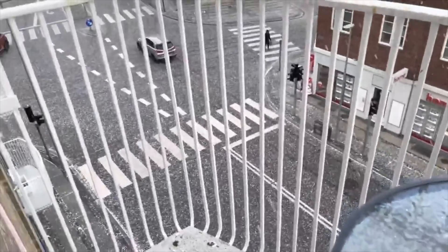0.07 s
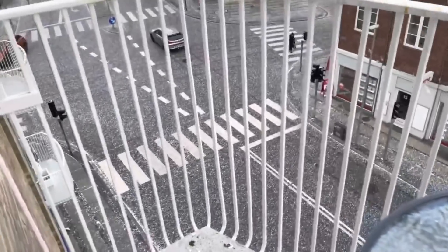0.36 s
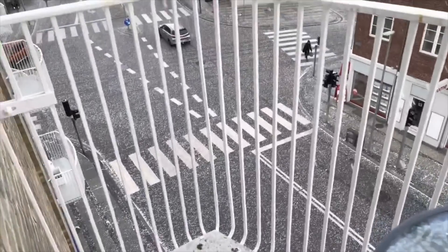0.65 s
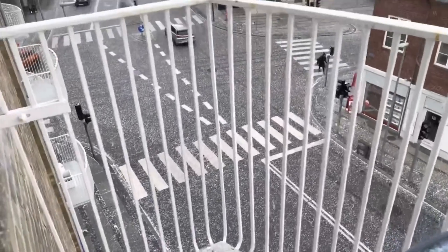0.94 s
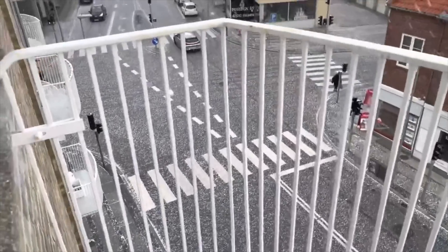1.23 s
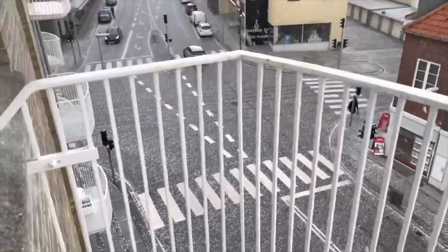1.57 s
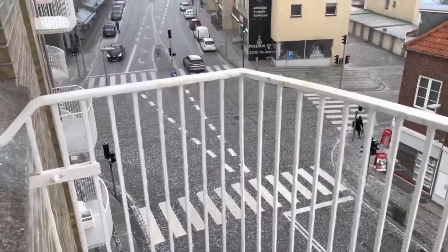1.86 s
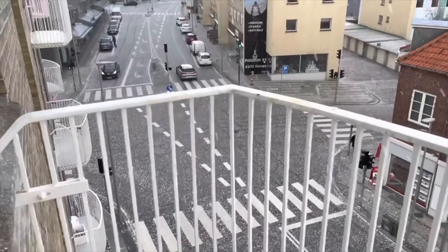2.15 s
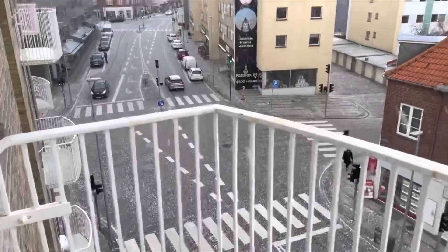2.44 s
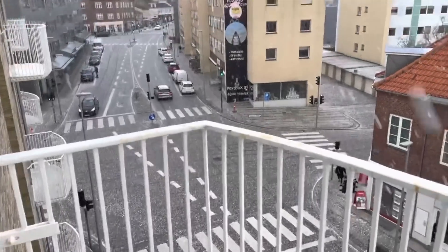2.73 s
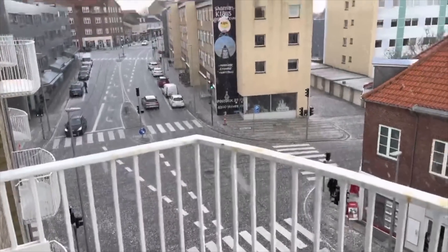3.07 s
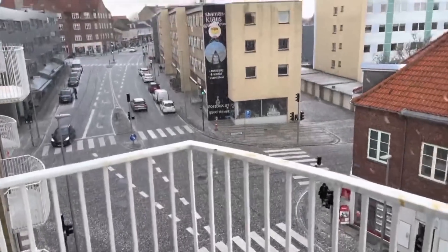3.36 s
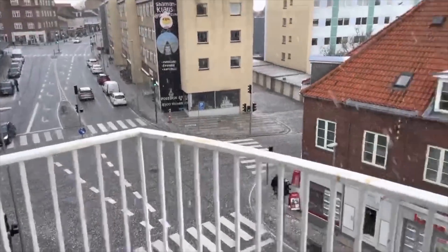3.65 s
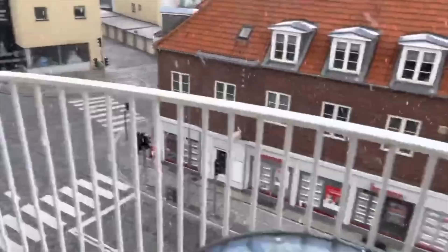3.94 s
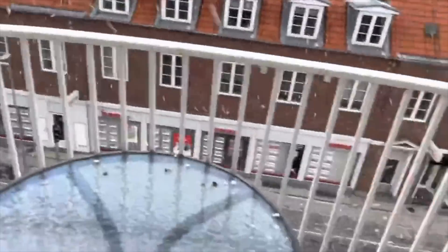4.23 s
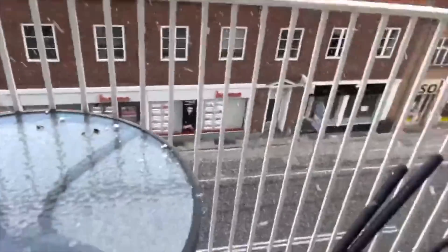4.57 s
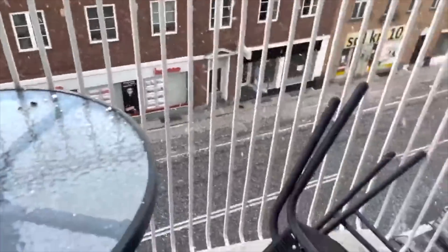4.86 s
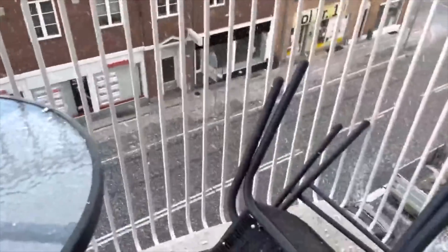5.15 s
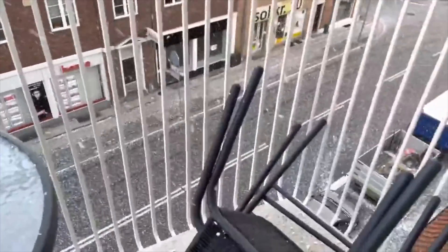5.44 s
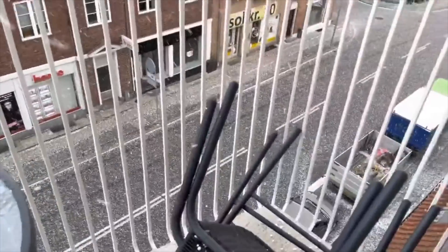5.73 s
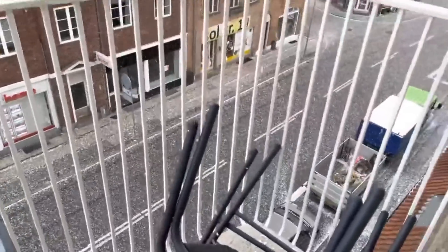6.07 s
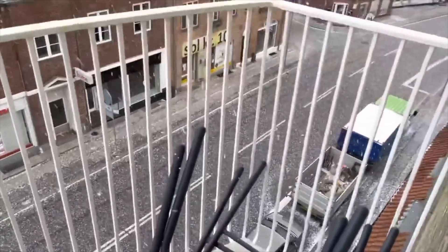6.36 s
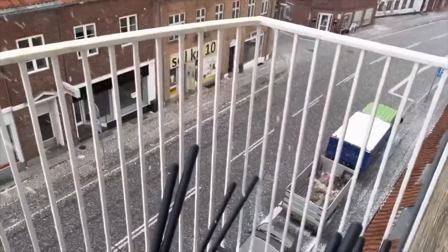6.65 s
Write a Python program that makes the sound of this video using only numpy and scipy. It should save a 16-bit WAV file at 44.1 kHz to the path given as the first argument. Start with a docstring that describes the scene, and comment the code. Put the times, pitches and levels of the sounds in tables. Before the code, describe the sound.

Hail patters on a street and clicks on a balcony while gusting wind buffets the microphone, with one brief dropout.

```python
"""Hail on a street, heard from a high balcony. At first a few stones click on the table and floor near the
microphone, over the far wash of countless others and light gusts. The sound fades to nothing, then at
about 1.7 s jumps back and plays the same moment again. From 3 s the wind roars and buffets the microphone,
a fine patter thickens close by, and more stones click on the balcony or chink off its railing."""
import sys
import numpy as np
from scipy import signal
from scipy.fft import rfft, irfft, next_fast_len
from scipy.io import wavfile
from scipy.ndimage import uniform_filter1d, map_coordinates

SR = 44100
rng = np.random.default_rng(int(sys.argv[2]) if len(sys.argv) > 2 else 0)


def store_wav(level_fs):
    """Save 16-bit WAV to argv[1]."""
    pcm = np.round(np.clip(np.atleast_2d(level_fs), -1, 1) * 32767)
    wavfile.write(sys.argv[1], SR, pcm.T.astype(np.int16))


N = 295401


# The loudest stones, beside the microphone. Each row: start in seconds, relative level in dB, pitch in Hz.
CLOSE_STONES = [(.026, -49, 9500), (.045, -56, 8000), (.125, -57, 9000), (.199, -57, 6500),
                (.239, -52, 9500), (.257, -55, 9000), (.329, -53, 9500), (.341, -56, 7000),
                (.57, -54, 8000), (.583, -52, 9500), (.654, -58, 8000), (.676, -48.5, 8200),
                (.722, -60, 9000), (.93, -63, 11000), (.959, -51, 9000), (1.848, -63, 10000),
                (2.229, -65, 12000), (2.356, -66, 8000), (2.72, -62, 12000), (2.879, -54, 8000),
                (3.152, -52, 12000), (3.188, -48, 6000), (3.207, -53, 8000), (3.256, -49, 10000),
                (3.273, -51, 13000), (3.507, -51, 10000), (3.566, -53, 6000), (3.697, -52, 10000),
                (3.743, -52, 12000), (3.792, -45, 7500), (3.805, -41, 10100), (3.815, -41, 5000),
                (3.87, -50, 8550), (3.941, -44, 7000), (3.95, -49, 8500), (4.0, -40, 10500),
                (4.039, -53, 10000), (4.127, -52, 7500), (4.142, -48, 6450), (4.213, -54, 6000),
                (4.3, -52, 7500), (4.359, -57, 7500), (4.39, -53, 10000), (4.452, -48, 9000),
                (4.696, -39, 6450), (4.705, -42, 3600), (4.76, -56, 8500), (4.816, -57, 11000),
                (4.875, -50, 7000), (4.897, -52, 6500), (4.99, -49, 13000), (5.025, -49, 9500),
                (5.046, -52, 10000), (5.252, -55, 12000), (5.314, -52, 9000), (5.378, -47, 13500),
                (5.396, -52, 7000), (5.71, -49, 8050), (5.724, -42, 8000), (5.732, -44, 10000),
                (5.745, -52, 10500), (5.898, -50, 10000), (5.923, -45, 9000), (5.975, -50, 6500),
                (6.005, -48, 10000), (6.174, -50, 7000), (6.352, -53, 10000), (6.475, -53, 7500),
                (6.598, -48, 8500), (6.626, -54, 9000), (6.673, -56, 7000)]
# Tone of their clicks. Each row: frequency in Hz, gain in dB.
CLICK_SPECTRUM = [(500, -32), (2000, 1), (4000, 0), (6500, -2), (9000, -7), (12000, -5.5), (15500, -6)]

def close_stones():
    """Single stones click on the balcony's table and floor."""
    starts, db, hz = np.transpose(CLOSE_STONES)
    hits = clicks(starts, amp(db - 5), hz, t60=0.036, ring_db=-4, focus_db=4)
    return coloured(hits, CLICK_SPECTRUM)


def clicks(starts, sizes, pitch_hz, t60, ring_db, focus_db):
    """Each stone gives three short rings near its pitch and a noisy crack, focus_db down an octave away."""
    t = np.arange(768) / SR
    pitch = pitch_hz[:, None]
    scatter = np.exp(.25 * rng.standard_normal((len(starts), 4, 1)))
    ring_hz = np.clip(pitch[:, None] * scatter[:, :3], 2000, SR / 2.2)
    ring = np.sin(2 * np.pi * ring_hz * t).mean(axis=1)
    octaves = np.log2((np.fft.rfftfreq(len(t), 1 / SR) + 1) / pitch)
    crack = irfft(rfft(rng.standard_normal(ring.shape)) * amp(-focus_db * octaves ** 2), len(t))
    crack /= crack.std(axis=1, keepdims=True)
    decay = amp(-60 * t / (t60 * scatter[:, 3]))
    hits = sizes[:, None] * (crack + amp(ring_db) * ring) * decay
    samples = np.round(starts * SR).astype(int)[:, None] + np.arange(len(t))
    return np.bincount(samples.ravel(), hits.ravel(), N)[:N]


# Stones on the railing, close by. Each row: start in seconds, pitch in Hz, peak in dB,
# length in seconds, level of the octave against the tone in dB, grit from 0 to 1.
RAILING_HITS = [(.08, 13500, -68, .016, -30, .5), (.364, 8150, -68, .014, -30, .4),
                (.676, 6360, -69, .04, -29, 0.6), (1.82, 7200, -68.5, .024, -32, 0.7),
                (1.992, 11760, -80, .09, -30, .3), (2.995, 8530, -64, .014, -30, .4),
                (3.32, 8180, -62, .017, -30, .4), (3.786, 12920, -59, .016, -30, .4),
                (3.969, 6400, -56, .017, -12, .7), (4.325, 6850, -68, .024, -30, .2),
                (4.632, 7410, -56.5, .024, -15, .2), (4.672, 12900, -62, 0.026, -30, .5),
                (4.928, 6675, -44.5, 0.024, -12, 0), (4.987, 6600, -51.5, .017, -5, .4),
                (5.121, 11250, -63, .012, -30, .5), (5.339, 6500, -58, .016, -18, .4),
                (5.578, 13400, -66, .026, -30, .6), (5.91, 13520, -54, .022, -30, 0.5),
                (5.997, 10300, -64, .016, -30, .4), (6.15, 4530, -58, 0.055, -30, .5),
                (6.324, 8010, -63, .031, -30, .3), (6.376, 7800, -60, 0.022, -30, .4),
                (6.658, 6750, -59, 0.026, -5, 0.9)]

def railing_chinks():
    """A stone glancing off the railing gives a brief, thin tone with its octave; grit smears the pitch."""
    out = np.zeros(N + SR)
    for start, hz, db, length, octave_db, grit in RAILING_HITS:
        t = np.arange(int(length * SR)) / SR
        phase = 2 * np.pi * hz * t + 0.26 * grit * np.cumsum(rng.standard_normal(len(t)))
        octave = amp(octave_db) * np.sin(2 * phase) * (2 * hz < SR / 2)
        arch = np.sin(np.pi * (t / length) ** 0.67) ** 2  # swells a little faster than it dies
        out[round(start * SR):][:len(t)] += amp(db) * arch * (np.sin(phase) + octave)
    return out[:N]


# Fine hail close to the balcony. Each row: time in seconds, level in dB.
PATTER_LEVELS = [(0, -68), (.33, -71), (.5, -75), (.7, -77), (.9, -83), (2.3, -87), (2.68, -84), (3.0, -67),
                 (3.1, -67), (3.33, -61), (3.43, -70), (3.56, -65), (3.69, -61.5), (3.85, -58.5),
                 (4.06, -66), (4.25, -62.5), (4.45, -63), (4.56, -66.5), (4.8, -63.5), (4.88, -61.5),
                 (4.96, -66.5), (5.2, -67), (5.42, -64), (5.52, -66), (5.84, -67), (6.18, -64.5),
                 (6.7, -65.5)]
# Its bright tone. Each row: frequency in Hz, relative gain in dB.
PATTER_SPECTRUM = [(1000, -26), (2500, 19.5), (4000, 11), (6000, 2), (8000, 1), (11000, -1), (15000, -2)]

def near_patter():
    """Near stones give a fine patter in flurries, and the nearest a dense crackle."""
    flurry_db = .6 * wobble(rate=14)
    patter = unit(shower(rate=2900, spread_db=3, t60=0.008))
    patter += amp(1) * crackle(count=2000, spread_db=12)
    return amp(curve(PATTER_LEVELS) + flurry_db) * unit(coloured(patter, PATTER_SPECTRUM))


def crackle(count, spread_db):
    """Small stones of uneven size and pitch click at random moments, at rms 1."""
    when, size, pitch = rng.random((count, 3)).T
    hz = 9000 * 2 ** (1.5 * (pitch - .5))
    return unit(clicks(when * N / SR, amp(spread_db * size ** 2), hz, t60=0.018, ring_db=4, focus_db=10))


# Hail on the street far below. Each row: time in seconds, level in dB.
STREET_LEVELS = [(0, -47.5), (.45, -49.5), (.85, -50), (2.3, -49), (2.75, -48.5), (3.08, -47),
                 (3.38, -47.5), (3.67, -45.3), (3.95, -46.5), (4.2, -48), (4.36, -48.5), (4.8, -46.5),
                 (4.88, -44), (5.03, -48.5), (5.8, -48), (6.3, -47.5), (6.7, -46.5)]
# Its dull tone from the balcony. Each row: frequency in Hz, relative gain in dB.
STREET_SPECTRUM = [(150, -21.5), (500, 6), (1000, 10.5), (1600, 5), (2200, -2.5), (3200, -10), (4500, -17),
                   (6500, -29), (9000, -37.5), (15000, -43)]

def street_wash():
    """Countless far stones merge into a dull wash."""
    far_stones = shower(rate=6000, spread_db=-0.5, t60=0.011)
    return amp(curve(STREET_LEVELS)) * unit(coloured(far_stones, STREET_SPECTRUM))


def shower(rate, spread_db, t60):
    """Stones land at random, rate a second, each a tiny burst of noise as the ice cracks and skids."""
    sizes = amp(spread_db * np.minimum(rng.standard_normal(N), 2))
    blows = (rng.random(N) < rate / SR) * sizes
    decay = amp(-60 / (t60 * SR))
    power = signal.lfilter([1], [1, -decay ** 2], blows ** 2)
    return np.sqrt(power) * rng.standard_normal(N)


# Gusts that strike the microphone. Each row: start in seconds, length in seconds, peak pressure in dB.
MIC_GUSTS = [(0.035, 0.24, -32.5), (0.202, 0.39, -29), (0.544, 0.13, -27.5), (0.638, 0.19, -32),
             (0.81, 0.27, -38), (1.736, 0.21, -32), (1.924, 0.32, -40.5), (2.373, 0.43, -39.5),
             (2.7, 0.45, -38), (3.047, 0.1, -34), (3.33, 0.2, -31.5), (3.414, 0.12, -19.5),
             (3.507, 0.12, -22.5), (3.635, 0.24, -27.5), (3.84, 0.33, -25), (3.99, 0.21, -22.5),
             (4.152, 0.2, -24), (4.293, 0.094, -19), (4.406, 0.23, -23), (4.523, 0.31, -29),
             (4.783, 0.54, -26.5), (4.962, 0.16, -22), (5.105, 0.26, -31.5), (5.29, 0.31, -30.5),
             (5.492, 0.21, -30.5), (5.69, 0.18, -28), (5.993, 0.3, -35.5)]
# Tone of their slow swings and of their buffeting. Each row: frequency in Hz, relative gain in dB.
SWING_SPECTRUM = [(10, -25), (20, -8.5), (27.5, 3.5), (38, -4.5), (52, -7), (65, -14), (80, -26.5),
                  (160, -40), (500, -100)]
BUFFET_SPECTRUM = [(40, -23.5), (80, -12.5), (112, 0), (150, 0), (220, -6), (330, -9), (600, -22.5),
                   (2000, -50), (6000, -100)]
DRAUGHT_DB, USUAL_GUST_DB = -45.5, -23  # pressure between gusts, and in a typical one

def microphone_gusts():
    """Gusts press on the microphone with slow pressure swings and a deep, buffeting rumble."""
    t = np.arange(N) / SR
    skew = 0.56  # under 1: a gust swells faster than it dies
    arches = [amp(db) * np.sin(np.pi * np.clip((t - start) / length, 0, 1) ** skew)
              for start, length, db in MIC_GUSTS]
    pressure = np.linalg.norm(arches, axis=0)  # overlapping gusts add in power
    swing = eddies(SWING_SPECTRUM, patchy_db=-1)
    swing /= np.sqrt(np.abs(uniform_filter1d(swing ** 2, size=3300)) + 1e-3)  # evens out its level
    force = (pressure / amp(USUAL_GUST_DB)) ** 0.82
    buffet = amp(USUAL_GUST_DB - 12.5) * force * eddies(BUFFET_SPECTRUM, patchy_db=.5)
    return np.hypot(amp(DRAUGHT_DB), pressure) * swing + buffet


# The wind's roar round the balcony. Each row: time in seconds, level in dB.
ROAR_LEVELS = [(0, -40), (.1, -42.5), (.33, -41.5), (.5, -44.5), (.6, -42), (.85, -43.5), (2.35, -47.5),
               (2.77, -42.5), (2.96, -37), (3.07, -32), (3.16, -34), (3.26, -36.5), (3.36, -38),
               (3.46, -34.5), (3.7, -32), (3.88, -35), (4.04, -34.5), (4.45, -38.5), (4.76, -36.5),
               (4.95, -33), (5.2, -34.5), (5.4, -38), (5.68, -40), (6.05, -37), (6.35, -35.5), (6.6, -42),
               (6.7, -40)]
# Tone of its roar and of its rumble. Each row: frequency in Hz, relative gain in dB.
ROAR_SPECTRUM = [(100, -33), (200, -2), (320, 1), (500, -1), (750, -5), (1100, -14), (1700, -22.5),
                 (3000, -33.5), (6000, -44.5), (15000, -66)]
RUMBLE_SPECTRUM = [(40, -29), (80, -15.5), (115, -7), (160, -5), (220, -2), (320, -8.5), (600, -29),
                   (2000, -46.5), (6000, -100)]
RUMBLE_DB, USUAL_WIND_DB = -47, -43  # the rumble's level, and the roar at which it holds

def balcony_wind():
    """Wind roars and rumbles round the balcony; small eddies shake both sounds together."""
    wind_db = curve(ROAR_LEVELS)
    flutter = wobble(rate=45)
    rumble_db = RUMBLE_DB + 0.15 * (wind_db - USUAL_WIND_DB)
    rumble = amp(rumble_db + 0.24 * flutter) * eddies(RUMBLE_SPECTRUM, patchy_db=1)
    roar = amp(wind_db + 0.79 * flutter) * eddies(ROAR_SPECTRUM, patchy_db=0.97)
    return rumble + roar


def eddies(spectrum, patchy_db):
    """Turbulent noise of rms 1 whose bands swell and sink in patches."""
    bands = signal.stft(rng.standard_normal(N), nperseg=1024)[2]
    patches = uniform_filter1d(rng.standard_normal(bands.shape), size=6, axis=0)
    patches = uniform_filter1d(patches, size=7, axis=1)
    noise = signal.istft(bands * amp(patchy_db * unit(patches)), nperseg=1024)[1][:N]
    return unit(coloured(noise, spectrum))


def coloured(x, spectrum):
    """x through a causal filter with the gain of the (Hz, dB) points."""
    m = 2 * next_fast_len(N // 2 + SR // 4)
    hz, db = np.transpose(spectrum)
    gain = amp(np.interp(np.log(np.fft.rfftfreq(m, 1 / SR) + 1), np.log(hz), db))
    cepstrum = irfft(np.log(gain), m)
    cepstrum[1:m // 2] *= 2  # minimum phase: nothing rings ahead of a hit
    cepstrum[m // 2 + 1:] = 0
    return irfft(rfft(x, m) * np.exp(rfft(cepstrum)), m)[:N]


def wobble(rate):
    """A smooth random curve, rate knots a second."""
    knots = rng.standard_normal(int(N * rate / SR) + 4)
    return map_coordinates(knots, [np.arange(N) * rate / SR])


def curve(rows):
    """One value per sample, joining the (seconds, value) points."""
    return np.interp(np.arange(N) / SR, *np.transpose(rows))


def amp(db):
    """Decibels to gain."""
    return 10 ** (np.asarray(db) / 20)


def unit(x):
    """x at rms 1."""
    return x / np.sqrt(np.mean(x ** 2) + 1e-20)


def scene():
    """Wind and hail at one microphone on the balcony."""
    wind = microphone_gusts() + balcony_wind()
    hail = street_wash() + near_patter() + close_stones() + railing_chinks()
    return (wind + hail)[None]


JUMP_S, REPEAT_S = 1.745, .7857  # when the sound jumps back, and how far
FADE_S, SILENT_S, SPLICE_S = 0.38, 0.063, .004

def stutter(x):
    """The stretch after JUMP_S sounds twice: first early, fading to silence, then in place at full level."""
    t = np.arange(N) / SR
    start = JUMP_S - REPEAT_S
    fade = np.clip((JUMP_S - SILENT_S - t) / FADE_S, 0, 1) + amp(-68)
    before = np.clip((start + SPLICE_S - t) / SPLICE_S, 0, 1)
    after = np.clip((t - JUMP_S) / SPLICE_S, 0, 1)
    early = np.roll(x, -round(REPEAT_S * SR), axis=1) * fade
    return (before + after) * x + (1 - before - after) * early


def record(dry):
    """The sound fades and jumps back once, and the highest treble is cut off."""
    m = next_fast_len(N + SR // 2)
    soft_ends = signal.windows.tukey(N, .001)
    passband = np.fft.rfftfreq(m, 1 / SR) < 15650
    return irfft(rfft(stutter(dry) * soft_ends, m) * passband, m)[:, :N]


dry = scene()
out = record(dry)
store_wav(out)
```